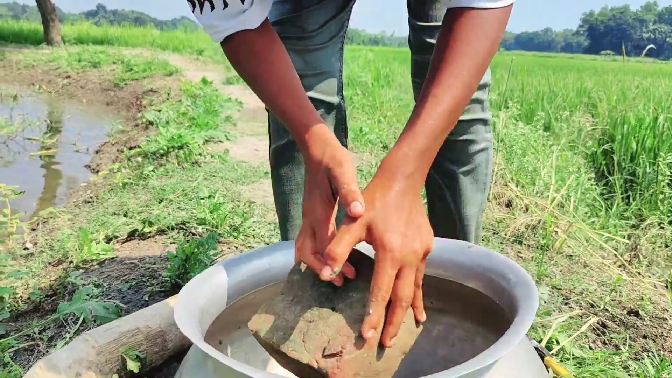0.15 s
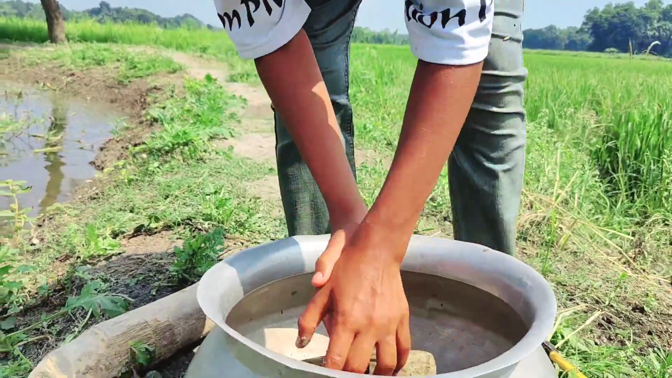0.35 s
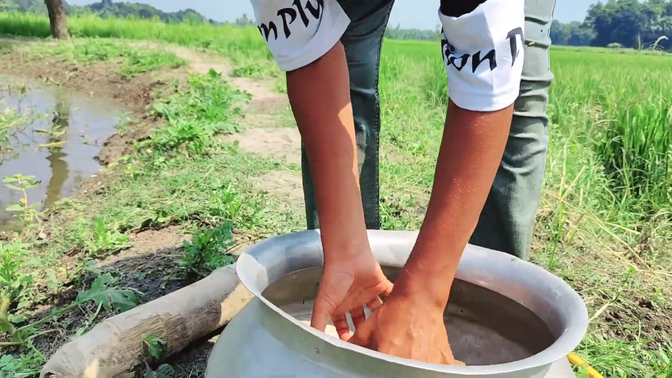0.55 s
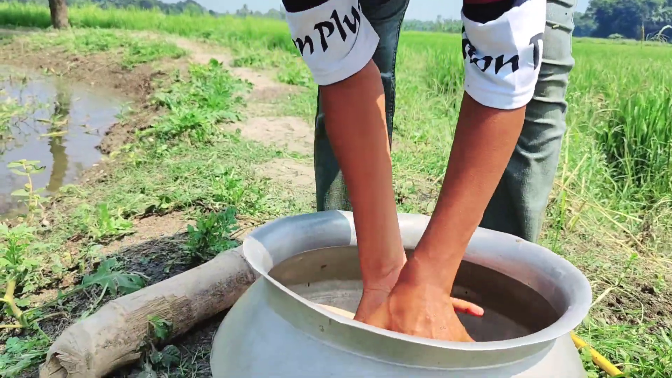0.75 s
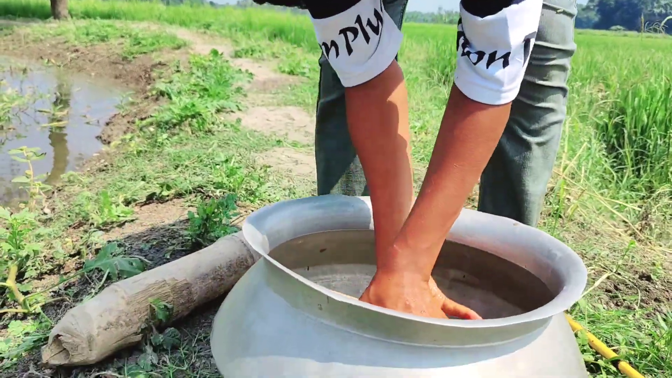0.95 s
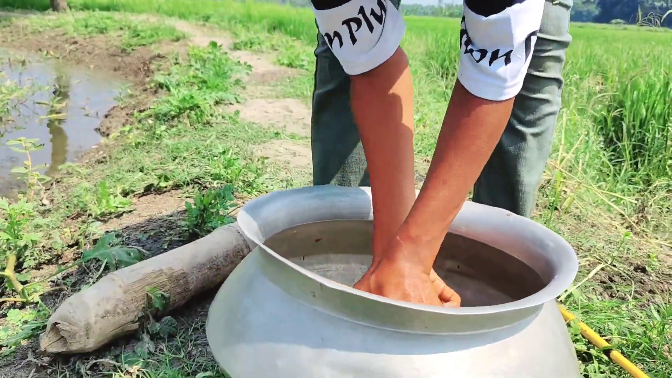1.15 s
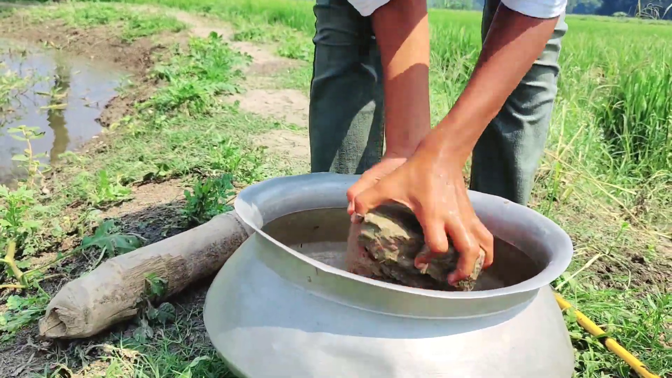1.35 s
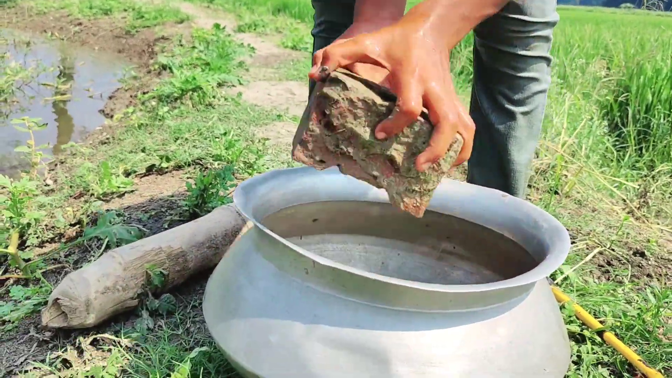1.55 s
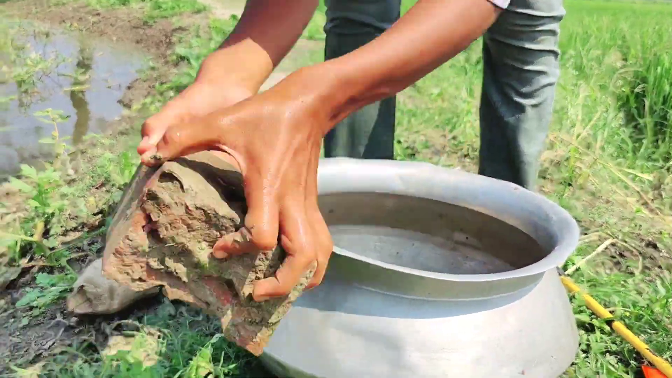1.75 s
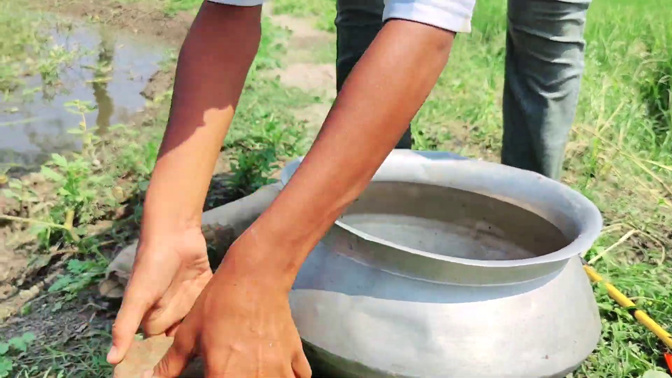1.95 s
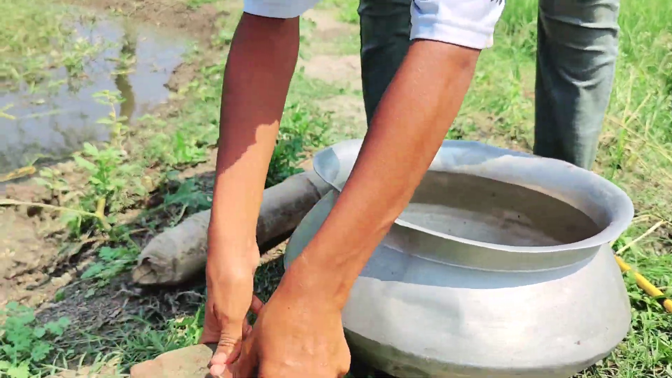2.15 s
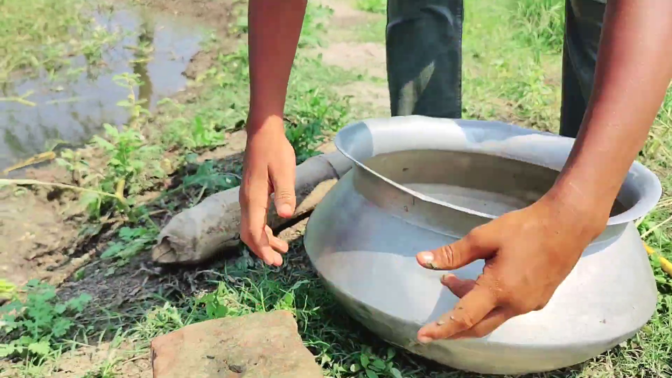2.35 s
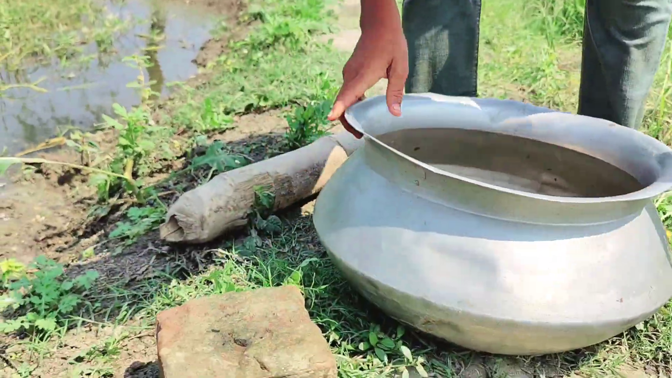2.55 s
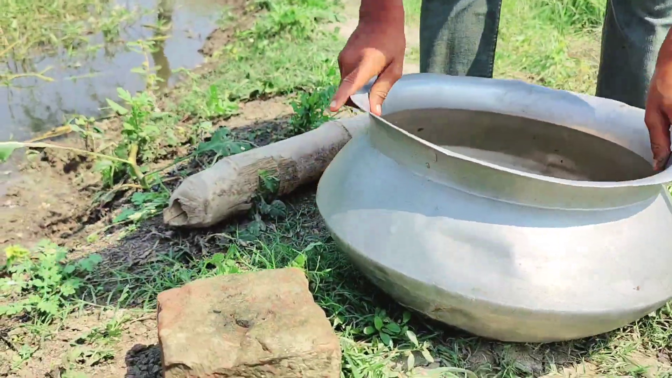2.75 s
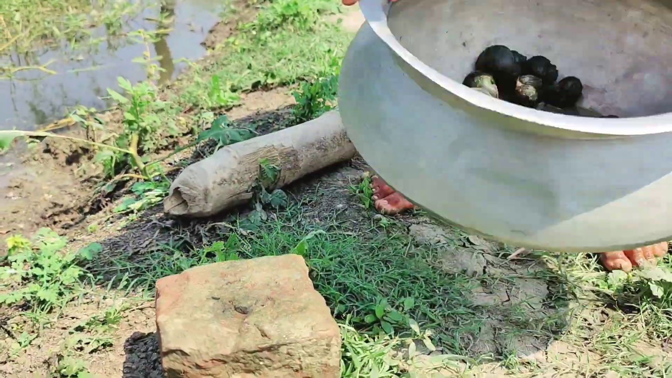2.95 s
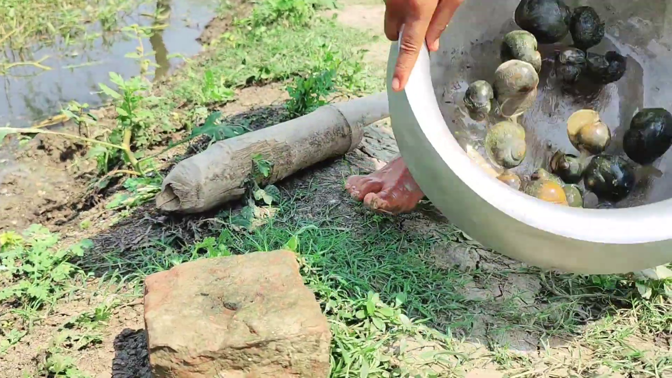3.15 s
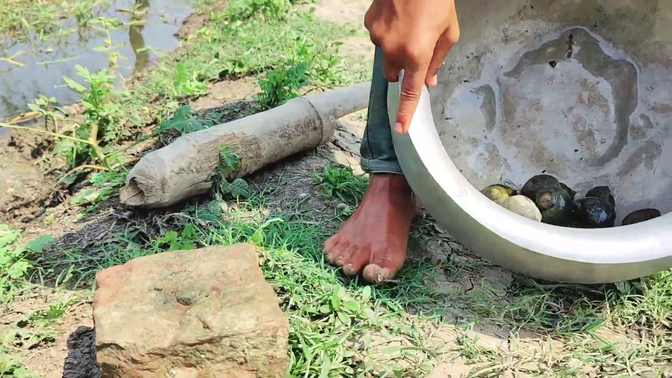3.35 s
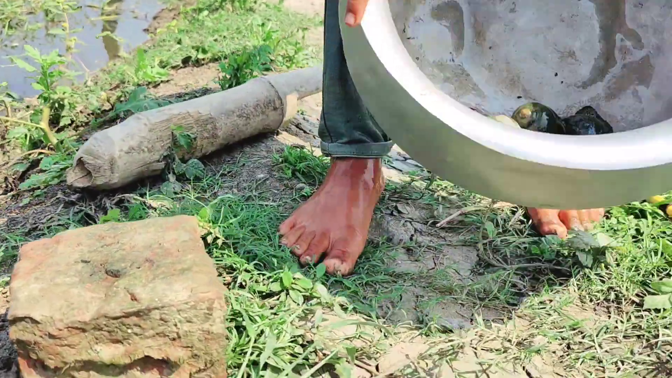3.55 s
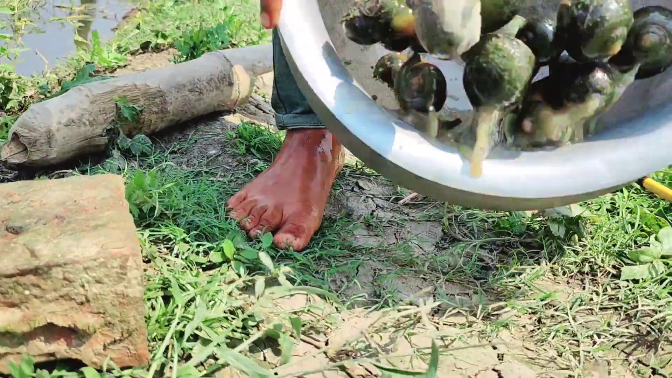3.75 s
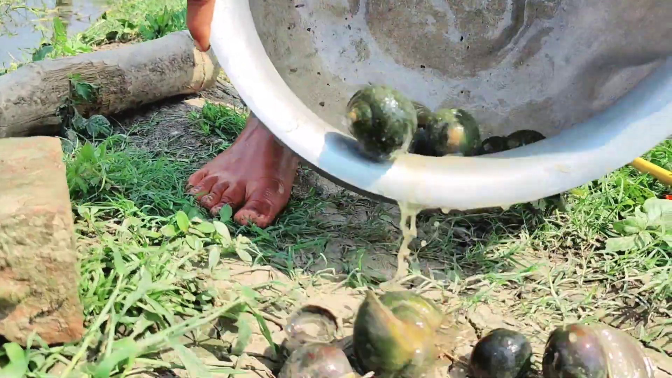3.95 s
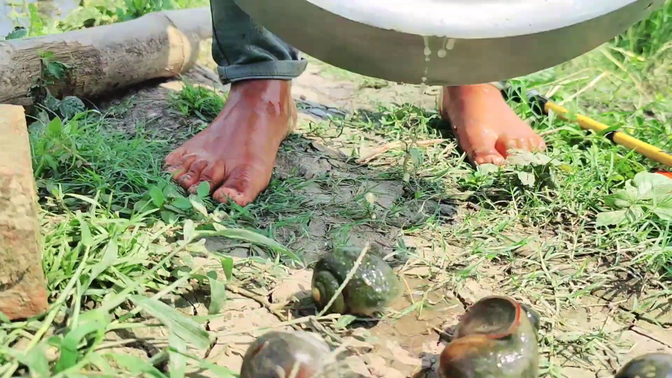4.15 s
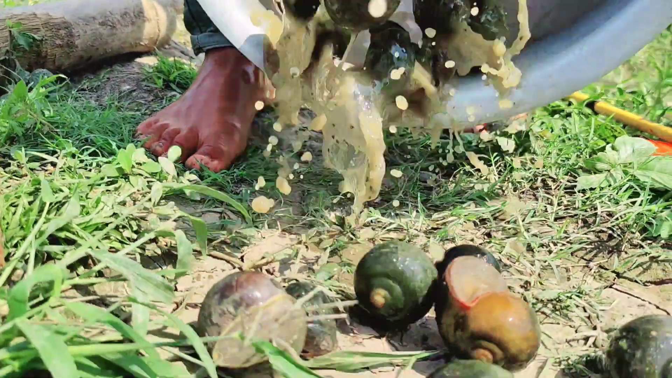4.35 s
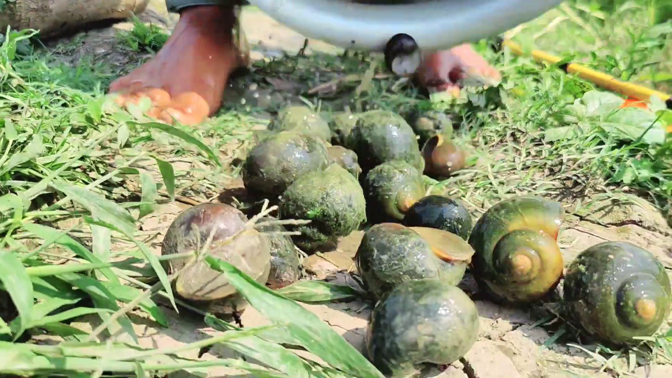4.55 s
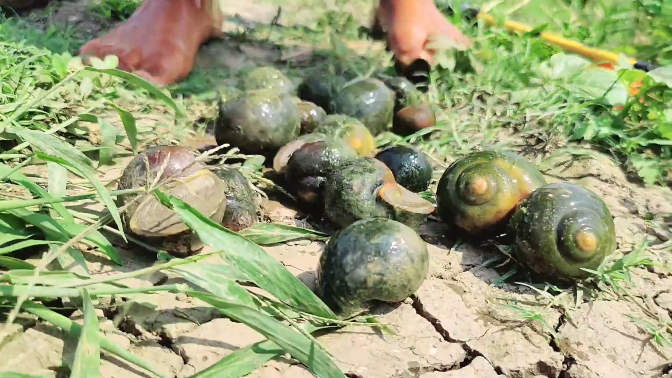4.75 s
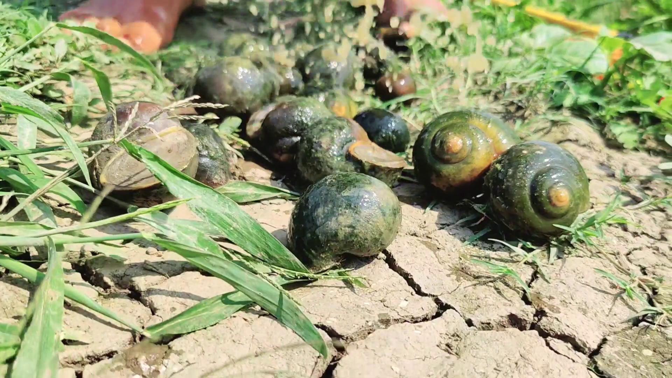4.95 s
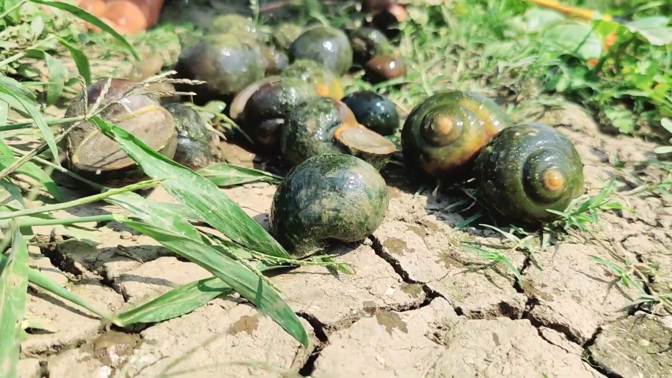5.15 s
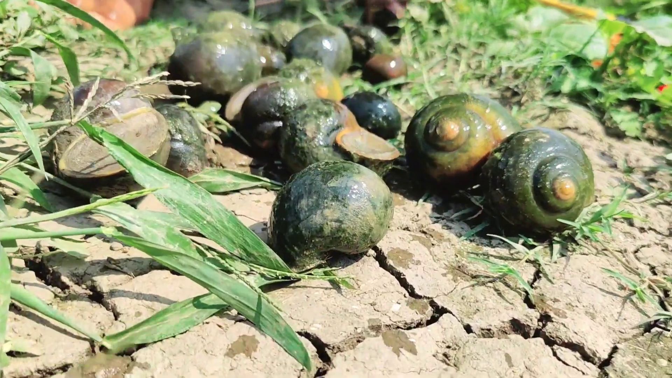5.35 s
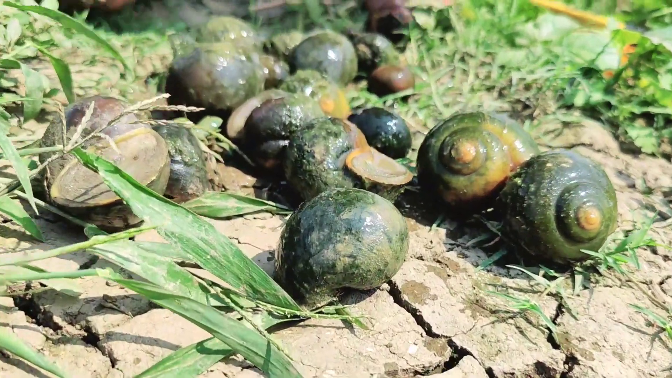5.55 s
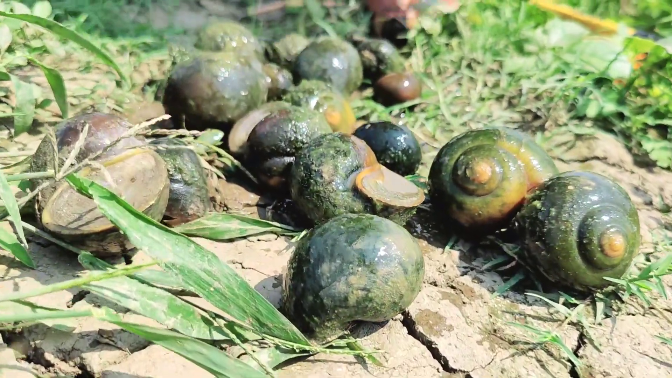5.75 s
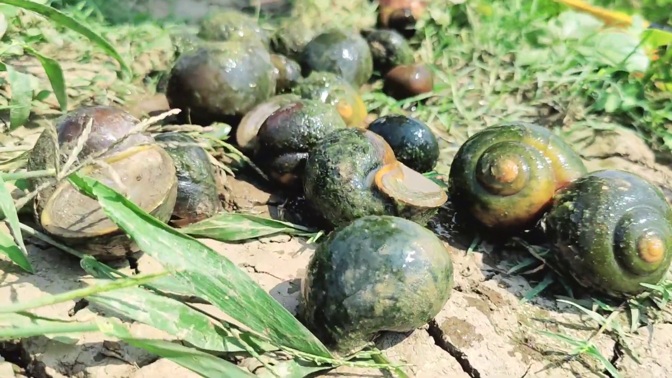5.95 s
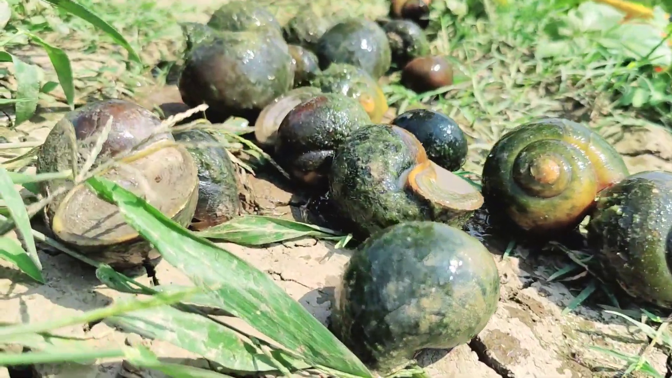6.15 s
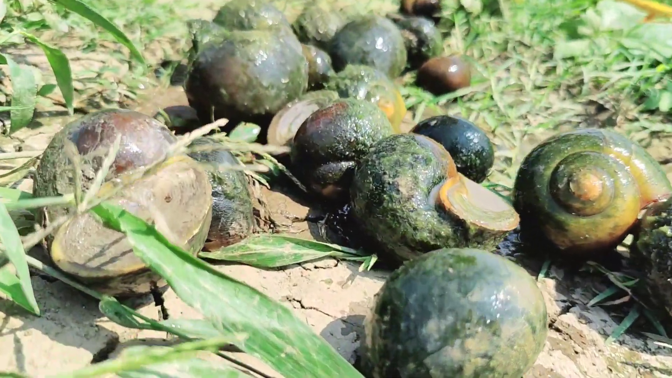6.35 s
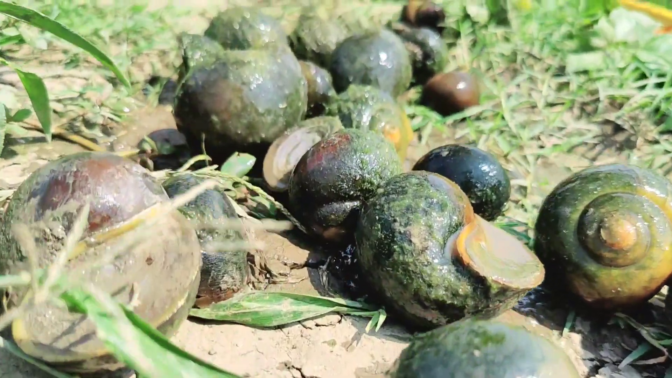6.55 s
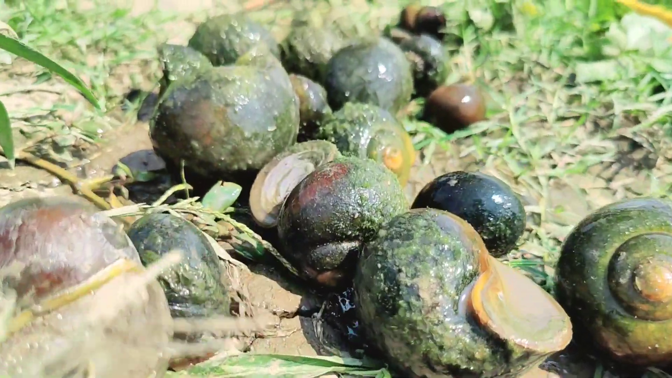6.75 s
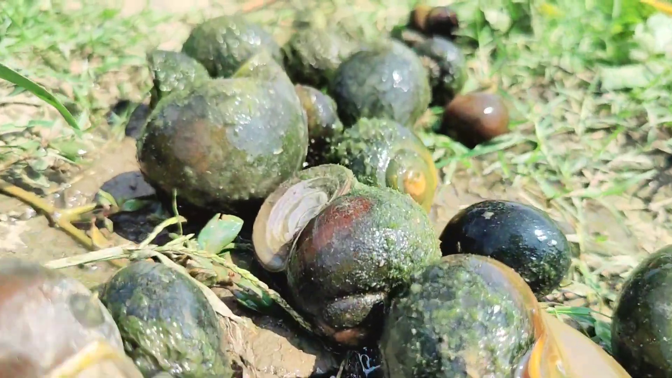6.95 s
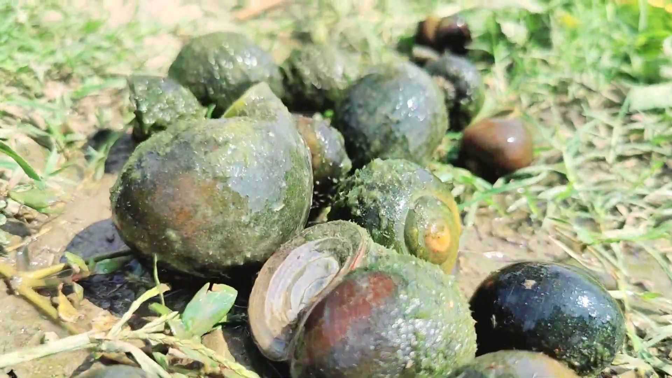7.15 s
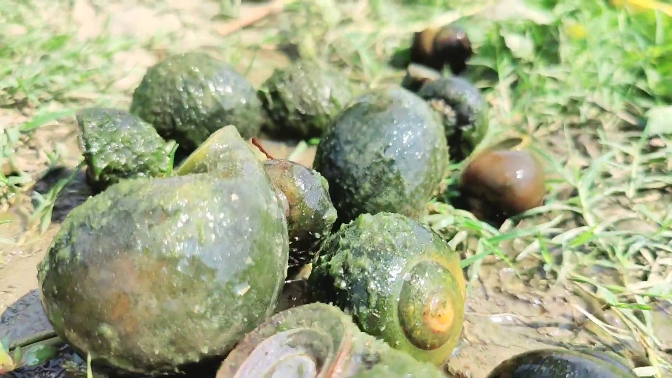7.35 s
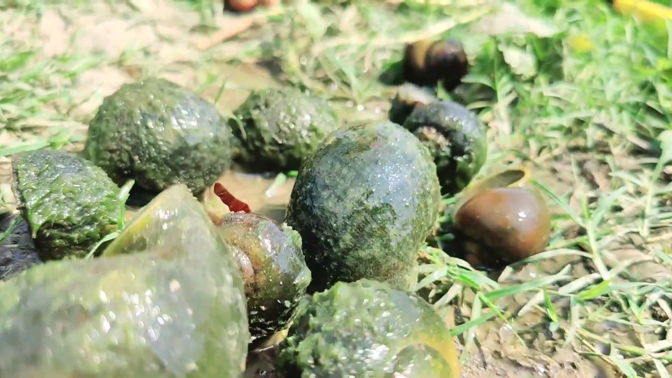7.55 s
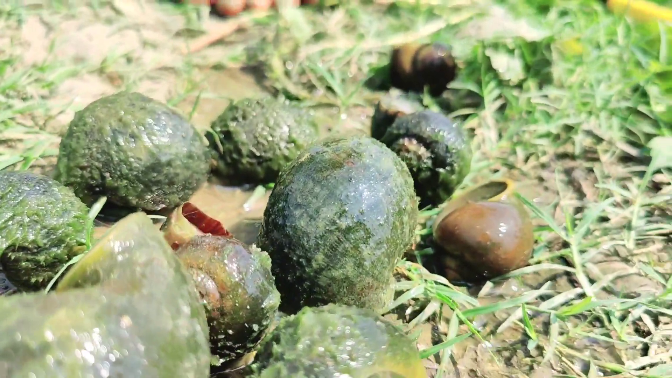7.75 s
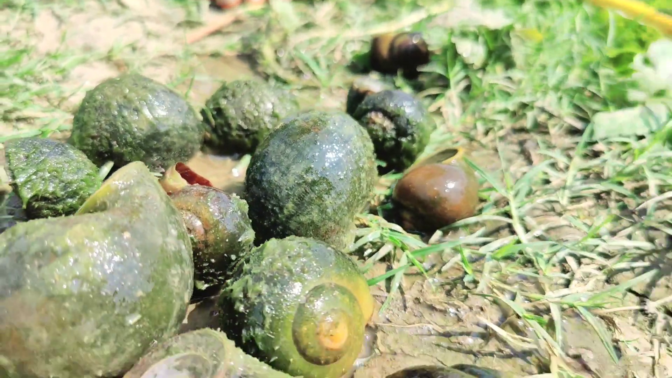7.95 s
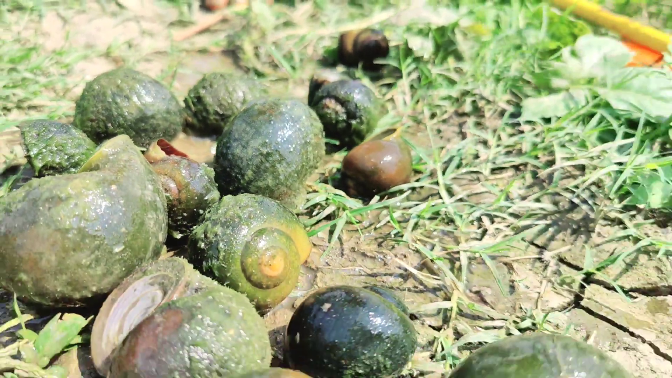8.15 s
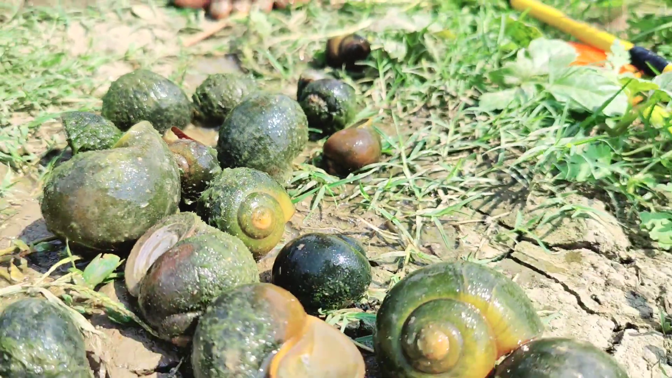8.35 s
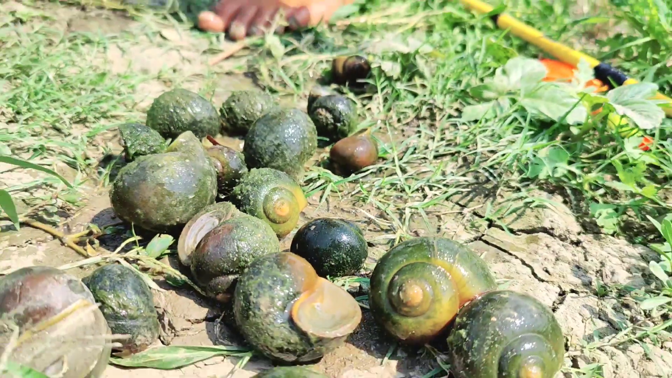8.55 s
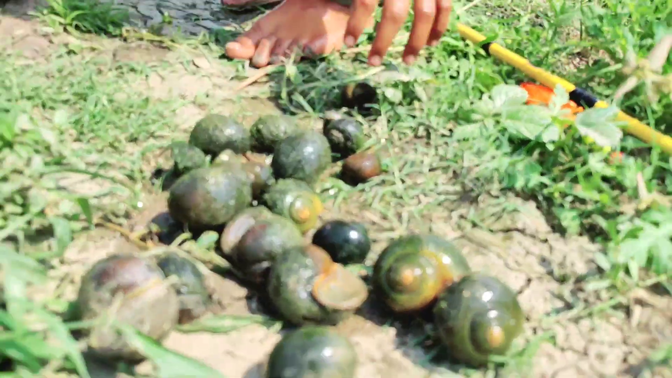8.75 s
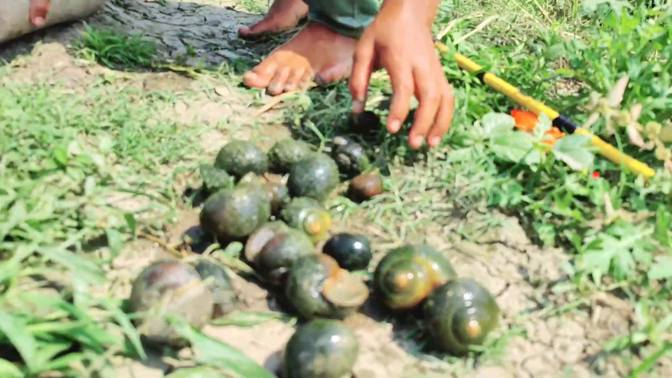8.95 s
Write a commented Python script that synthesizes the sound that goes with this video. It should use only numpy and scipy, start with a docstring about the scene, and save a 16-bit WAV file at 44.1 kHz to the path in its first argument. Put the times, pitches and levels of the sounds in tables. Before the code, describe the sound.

A brick grinds and knocks out of an aluminium basin, then wet water snails clatter and tumble from it onto dry ground outdoors.

```python
"""Water snails tumble down a tipped aluminium basin: shells clack, drum on its floor and ring its damped modes.
A little water leaves with them as spatter and bubbles; the last snails are shaken out.
Before that a brick grinds, judders and knocks out of the basin and drops on the grass; at the end the basin is set down.
Behind, grass brushes and a small bird whistles now and then, and two far pump engines thud throughout."""
import sys
import numpy as np
from scipy import signal
from scipy.fft import rfft, irfft, next_fast_len
from scipy.io import wavfile
from scipy.ndimage import uniform_filter1d, map_coordinates

SR = 44100
rng = np.random.default_rng(int(sys.argv[2]) if len(sys.argv) > 2 else 0)


def materialize(psi):
    """Save the field psi as 16-bit PCM at rate SR to the path in sys.argv[1].

    A 1-D psi becomes a single channel; in a 2-D psi each row is a channel.
    """
    bounded = np.clip(np.atleast_2d(psi).T, -1, 1)
    quanta = np.round(bounded * 32767).astype(np.int16)
    wavfile.write(sys.argv[1], SR, quanta)


N = 397341

# Levels are relative: source gains and the output gain follow.
# far pump engines: firings_per_s, level_db
PUMP_ENGINES = [(14.08, -45), (14.78, -47.5)]
# dips of the field hiss: middle_s, sigma_s, removed_share_db
HISS_DIPS = [(7.83, 0.45, -4.5)]
# arched bird notes: start_s, length_s, top_hz, level_db
BIRD_NOTES = [(2.151, 0.0244, 5160, -44), (8.064, 0.021, 4680, -63.5), (8.3, 0.0357, 4950, -68),
              (8.355, .036, 4720, -67), (8.378, 0.051, 5480, -64), (8.494, 0.047, 5300, -62.5),
              (8.54, 0.029, 4870, -59.5), (8.64, 0.13, 5400, -61)]
# feet and hands brushing grass: middle_s, sigma_s, level_db
GRASS_STROKES = [(2.69, 0.025, -51.5), (2.88, 0.053, -54.5), (3.2, 0.14, -57), (5.04, 0.043, -51.5),
                 (5.68, 0.017, -49.5), (6.9, 0.14, -53), (8.9, 0.091, -64)]
# stalks crackling close by: middle_s, sigma_s, level_db
STALK_CRACKLES = [(5.27, 0.059, -52.5), (7.4, 0.046, -50), (7.57, 0.055, -50)]
# ticks of wet shells, grit and stalks: start_s, level_db, pitch_hz
DRY_TICKS = [(0.947, -32.5, 2210), (1.119, -28, 1690), (1.155, -31.5, 1220), (2.165, -21, 1336),
             (3.025, -33, 1940), (3.5688, -11, 5080), (4.6812, -21, 6670), (4.779, -34, 3500),
             (4.848, -30.5, 3946), (6.57, -45.5, 2920), (7.536, -34, 1200), (7.566, -39.5, 2460)]
# bumps on the ground: start_s, push_db, pitch_hz, crunch_db, basin_ring_db
GROUND_BUMPS = [(0.27, -11, 129.3, -32, -38.5), (2.167, -16.5, 104, -38.5, -75),
                (5.15, -25.5, 56, -78, -80), (6.949, -14.5, 205, -25, -23), (7.089, -29, 168, -37.5, -36)]
# brick pulled over the basin floor: start_s, hold_s, level_db
BRICK_PULLS = [(-.02, 0.071, -18), (0.264, 0.084, -18.5), (0.423, 0.29, -18.5), (.94, 0.17, -45.5)]
# brick edge sticking and slipping: middle_s, sigma_s, level_db, slips_per_s (nominal, at middle_s)
STICK_SLIPS = [(0.029, 0.03, -19, 276), (0.112, 0.028, -24, 258), (0.297, 0.017, -17, 440)]
# brick striking the basin: start_s, level_db, drum_db, pitch_hz
BRICK_HITS = [(0.179, -13.5, -24, 940), (0.203, -2, -13.5, 1000), (0.281, -2.5, -7.5, 1300),
              (0.314, -2, -24.5, 1587), (0.426, -2.5, -9, 1340), (0.462, -4.5, -4.5, 1530),
              (0.568, -3, -18, 1360), (0.61, -0.5, -14, 1410), (0.664, -3.5, -8, 2576),
              (0.693, -2.5, -5.5, 2050), (0.747, -9, -15, 956), (.893, -23.5, -22, 1496),
              (1.288, -18, -25.5, 900), (1.35, -17.5, -24.5, 1393), (1.415, -23, -32.5, 1100)]
# shells striking metal or each other: start_s, level_db, drum_db, pitch_hz
SHELL_STRIKES = [(3.331, -3.5, -4, 1361), (3.345, -8, -32, 2885), (3.376, -2, -20, 1150),
                 (3.434, -1.5, -10, 1630), (3.471, -4, -12, 1380), (3.544, -6.5, -12, 2024),
                 (3.566, -7, -13.5, 1381), (3.701, -21, -26.5, 1253), (3.844, -3, -10, 1130),
                 (3.875, -2.5, -17, 1114), (3.935, -3, -11.5, 1232), (3.969, -5.5, -5.5, 1208),
                 (3.984, -6, -17, 2030), (4.016, -2.5, -19.5, 1640), (4.05, -3.5, -15, 1703),
                 (4.089, -7.5, -16, 2070), (4.122, -8, -22, 1347), (4.196, -14, -7.5, 2650),
                 (4.247, -10.5, -33, 1434), (4.359, -17.5, -17.5, 1670), (4.388, -2.5, -15, 1604),
                 (4.409, -7, -15, 1184), (4.516, -10.5, -22, 443), (4.518, -0.5, -29, 1896),
                 (4.543, -6, -26, 1134), (4.6, -3.5, -31, 1930), (4.643, -16, -30, 2087),
                 (4.71, -24.5, -43, 2270)]
# snails sent off by a tilt or shake: start_s, hold_s, release_t60_s, clatter_db, drum_db, water_db
SNAIL_SURGES = [(3.326, 0.15, 0.28, -17, -21, -29), (3.54, 0.014, 0.47, -30.5, -31, -47),
                (3.792, 0.027, 1.77, -30, -26.5, -54), (3.843, 0.24, 0.48, -17.5, -21, -33.5),
                (4.384, 0.035, 0.21, -14, -26.5, -27), (4.514, 0.095, 0.2774, -21.5, -27.5, -25.5)]
# basin modes: mode_hz, undamped_t60_s, shell_db, brick_db
BASIN_MODES = [(426, 0.75, -1.5, -5.5), (682.4, 0.34, -10.5, -15), (763, .2, -20, -10.5),
               (1006, 0.046, -6, -7.5), (1173.7, 0.23, 0, -1.5), (1377, 0.27, -6, 0.5),
               (1650, 0.075, -3, -5), (2029, 0.24, -8, -7.5), (2630, 0.031, -7, -7.5)]

# engine exhaust spectrum: freq_hz, relative_db
EXHAUST_SPECTRUM = [(18, -37), (50, -3), (110, 3), (210, -8), (430, -15), (800, -35), (1900, -75)]
# field hiss spectrum: freq_hz, relative_db
AIR_SPECTRUM = [(1200, -7), (2400, 3), (3600, -10), (5000, -7.5), (7000, -22), (15000, -23)]
# brushed grass spectrum: freq_hz, relative_db
GRASS_SPECTRUM = [(600, -17), (1300, 4), (2400, 3.5), (15000, -17.5)]
# spatter, cracks and stalks spectrum: freq_hz, relative_db
SPRAY_SPECTRUM = [(1500, -26), (4000, -1.5), (15000, -3.5)]
# grinding and crunching grit spectrum: freq_hz, relative_db
GRIT_SPECTRUM = [(250, -7.5), (550, -5.5), (2000, -4.5), (4000, -18.5), (9000, -34), (15000, -36)]
# drummed basin floor spectrum: freq_hz, relative_db
DRUM_SPECTRUM = [(50, -26), (140, -8.5), (290, 0), (520, -11.5), (1200, -45)]
# shell clatter spectrum: freq_hz, relative_db
SHELL_SPECTRUM = [(600, -17.5), (1100, -5.5), (2200, 4.5), (4000, -7.5), (9000, -23), (15000, -31)]
# likeness of left and right: freq_hz, correlation (1 = mono)
STEREO_LIKENESS = [(300, 0.98), (600, 0.78), (1300, 0.66), (2800, .42), (14000, 0.53)]
# microphone port, a notch and a peak: freq_hz, gain_db
PORT_RESPONSE = [(4800, -0.5), (5900, -4), (7100, 7), (8700, 2)]

TOP_HZ = 15600
BIRD_RISE_MAX_S = 0.04
BIRD_ARCH_HZ, BIRD_ARCH_LENGTH_S = 876, .05  # arch depth of a note of this length
PULL_ATTACK_S, PULL_SLOPE_DB_PER_S, PULL_RELEASE_T60_S = 0.014, 7, 0.56
SURGE_ATTACK_S, SURGE_SLOPE_DB_PER_S = 0.0083, -2
JUDDER_GLIDE_OCTAVES_PER_S = 0.7
DRUM_HZ, DRUM_T60_S = 264.6, .06  # basin floor under one blow
BASE_HZ = 719  # bumps excite the basin modes near this pitch
SYMPATHY_HZ = 35  # half-width of the modes' response around a blow's pitch
HOLLOW_SCATTER = .06  # log-frequency spread of a knock's core
SHELL_COLUMN, BRICK_COLUMN, CRUNCH_COLUMN = 2, 3, 3


def amp(db):
    """Decibels to gain."""
    return 10 ** (np.asarray(db) / 20)


def unit(x):
    """Scale to rms 1."""
    return x / np.sqrt(np.mean(x ** 2) + 1e-20)


def along(points, hz):
    """Interpolate (freq_hz, value) points on a log-frequency axis."""
    f, v = np.transpose(points)
    return np.interp(np.log(hz + 1), np.log(f), v)


def wobble(knots_per_s):
    """Smooth random curve through Gaussian knots."""
    knots = rng.standard_normal(int(N * knots_per_s / SR) + 4)
    return map_coordinates(knots, [np.arange(N) * knots_per_s / SR])


def fade(t, t60):
    """Exponential decay of 60 dB in t60."""
    return np.exp(-np.log(1000) * t / t60)


def add(track, start_s, sound):
    """Mix a sound into a track in place."""
    start = max(round(start_s * SR), 0)
    part = track[..., start:start + sound.shape[-1]]
    part += sound[..., :part.shape[-1]]


def noise():
    """Independent white noises for middle and side."""
    return rng.standard_normal((2, N))


def colour(x, spectrum):
    """Minimum-phase filter that keeps the power of white noise."""
    size = 4096
    gain = unit(amp(along(spectrum, np.fft.rfftfreq(size, 1 / SR))))
    cepstrum = irfft(np.log(np.maximum(gain, 1e-6)))
    fold = np.r_[1, np.full(size // 2 - 1, 2), np.zeros(size // 2)]
    impulse = irfft(np.exp(rfft(cepstrum * fold)))
    return signal.fftconvolve(x, impulse[None], axes=1)[:, :N]


def patchy(depth_db):
    """Noise whose colour changes from instant to instant, as each contact has its own."""
    z = signal.stft(noise(), nperseg=256)[2]
    patches = rng.standard_normal(z.shape[1:])
    patches = uniform_filter1d(patches, size=3, axis=0)
    patches = uniform_filter1d(patches, size=5, axis=1)
    varied = z * amp(depth_db * unit(patches))
    return unit(signal.istft(varied, nperseg=256)[1][:, :N])


def swells(rows):
    """Sum of Gaussian strokes; rows of middle_s, sigma_s, level_db."""
    t = np.arange(N) / SR
    return sum(amp(db) * np.exp(-.5 * ((t - s) / sigma_s) ** 2) for s, sigma_s, db in rows)


def stroke(start_s, hold_s, attack_s, slope_db_per_s, release_t60_s):
    """Envelope of one push: linear attack, sloping hold, exponential release."""
    t = np.maximum(np.arange(N) / SR - start_s, 0)
    held = np.minimum(t / attack_s, 1) * amp(slope_db_per_s * np.minimum(t, hold_s))
    return held * fade(np.maximum(t - hold_s, 0), release_t60_s)


def contacts(per_s, spread_db, t60):
    """Envelope of random uneven small contacts, levelled to a local rms near 1."""
    count, t = int(per_s * N / SR), np.arange(SR // 4) / SR
    at = ((np.arange(count) + 2 * rng.random(count)) * SR / per_s).astype(int)
    powers = amp(spread_db * rng.standard_normal(count)) ** 2
    impulses = np.bincount(at, powers, N)[:N]
    shape = fade(t, t60) * (1 - np.exp(-t / 0.00085))
    power = np.abs(signal.fftconvolve(impulses, shape ** 2)[:N])
    return np.sqrt(power / (np.abs(uniform_filter1d(power, size=4000)) + 1e-9))


def blows(rows, t60, level_column=1):
    """Envelope of listed blows, summed as power."""
    power, t = np.zeros(N), np.arange(SR // 4) / SR
    shape = fade(t, t60) * (1 - np.exp(-t / 0.00058))
    for row in rows:
        add(power, row[0], (amp(row[level_column]) * shape) ** 2)
    return np.sqrt(power)


def grains(per_s, hz, scatter, cycles, spread_db, rise):
    """Random short pings, levelled to a local rms near 1 in the middle; their pitch rises as they die."""
    count, t = int(per_s * N / SR), np.arange(700) / SR
    pitch, size, side = rng.standard_normal((count, 3)).T[:, :, None]
    f = np.minimum(hz * np.exp(scatter * pitch), SR / 3)
    age = t * f / cycles
    tone = np.sin(2 * np.pi * f * t * (1 + rise * np.minimum(age, 1)))
    ping = amp(spread_db * size) * fade(age, 0.92) * tone
    at = (rng.integers(0, N, (count, 1)) + np.arange(len(t))).ravel()
    pair = np.array([np.bincount(at, p.ravel(), N)[:N] for p in (ping, ping * side)])
    return pair / np.sqrt(np.abs(uniform_filter1d(pair[0] ** 2, size=4000)) + 1e-9)


def cluster(t, hz, scatter, t60, count=24):
    """Dry knock: short modes scattered around one pitch, as middle and side."""
    pitch = np.minimum(hz * np.exp(scatter * rng.standard_normal((count, 1))), SR / 3)
    modes = np.sin(2 * np.pi * (pitch * t + rng.random((2, count, 1))))
    return modes.sum(axis=1) / np.sqrt(count) * fade(t, t60)


def sympathy(t, hz):
    """Undamped ring of the basin modes, strongest near the pitch of a blow."""
    ring = np.zeros(len(t))
    for mode_hz, t60, *_ in BASIN_MODES:
        nearness = 1 / (1 + ((mode_hz - hz) / SYMPATHY_HZ) ** 2)
        ring += nearness * fade(t, t60) * np.sin(2 * np.pi * mode_hz * t)
    return ring


def basin(force, damping, level_column):
    """Basin modes build up and ring on under a rattling force; damping divides each t60."""
    t = np.arange(SR * 3 // 4) / SR
    ring = np.zeros(len(t))
    for row in BASIN_MODES:
        tone = np.sin(2 * np.pi * row[0] * t + rng.uniform(0, 2 * np.pi))
        ring += amp(row[level_column]) * unit(fade(t, row[1] / damping) * tone)
    return signal.fftconvolve(force * noise(), ring[None] / np.linalg.norm(ring), axes=1)[:, :N]


def clacks(hits, t60, scatter, knock_db, hollow_db, ring_db):
    """A hard contact gives a broad knock with a hollow core, drums the floor and rings the nearest modes."""
    out, t = np.zeros((2, N)), np.arange(SR // 2) / SR
    onset, short = 1 - np.exp(-t / 0.0021), t[:SR // 10]
    for s, db, drum_db, hz in hits:
        drum_hz = DRUM_HZ * np.exp(0.16 * rng.standard_normal())
        drum = fade(t, DRUM_T60_S) * np.sin(2 * np.pi * drum_hz * t) * [[1], [0]]
        ring = amp(db + ring_db) * sympathy(t, hz) * [[1], [rng.uniform(-1, 1)]]
        add(out, s, (ring + amp(drum_db) * drum) * onset)
        knock = amp(knock_db) * cluster(short, hz, scatter, t60)
        core = amp(hollow_db) * cluster(short, hz, HOLLOW_SCATTER, 2 * t60, count=6)
        add(out, s, amp(db) * (knock + core) * onset[:len(short)])
    return out


def field():
    """Two slow single-cylinder pumps puff noise, drifting in and out of step under a wavering hiss."""
    t, puffs = np.arange(N) / SR, np.zeros((2, N))
    for firings_per_s, db in PUMP_ENGINES:
        since_s = (t * firings_per_s + 0.0091 * wobble(4.0)) % 1 / firings_per_s
        carry = amp(db + wobble(3))
        puffs += carry * unit(fade(since_s, 0.15) + 0.59) * noise()
    hiss_level = amp(-62.5 + 2 * wobble(1.6)) * (1 - np.minimum(swells(HISS_DIPS), 1))
    return colour(puffs, EXHAUST_SPECTRUM) + hiss_level * colour(patchy(depth_db=2), AIR_SPECTRUM)


def bird():
    """Thin whistles leap up and sink back; the longer the note, the deeper its arch."""
    song = np.zeros(N)
    for s, length_s, top_hz, db in BIRD_NOTES:
        t = np.arange(int(length_s * SR)) / SR
        crest_s = min(BIRD_RISE_MAX_S, length_s / 2)
        away = np.where(t < crest_s, (crest_s - t) / crest_s, (t - crest_s) / (length_s - crest_s))
        hz = top_hz - BIRD_ARCH_HZ * np.sqrt(length_s / BIRD_ARCH_LENGTH_S) * away ** 1.6
        envelope = np.sqrt(np.abs(np.sin(np.pi * t / length_s)))
        add(song, s, amp(db) * envelope * np.sin(2 * np.pi * np.cumsum(hz) / SR))
    return np.array([song, song / 2])


def grass():
    """Blades brush softly as sparse contacts; stalks crackle as fine dense ones."""
    stalks = swells(STALK_CRACKLES) * contacts(per_s=450, spread_db=6.5, t60=0.035)
    blades = swells(GRASS_STROKES) * contacts(per_s=62, spread_db=2, t60=0.18)
    brush = blades + amp(-11.5) * stalks
    return colour(brush * patchy(depth_db=0.5), GRASS_SPECTRUM) + colour(stalks * noise(), SPRAY_SPECTRUM)


def ticks():
    """Each tick is a tiny noise crack and a brief dry knock."""
    knocks, t = np.zeros((2, N)), np.arange(SR // 20) / SR
    for s, db, hz in DRY_TICKS:
        add(knocks, s, amp(db - 2.5) * cluster(t, hz, scatter=.45, t60=0.025))
    cracks = colour(blows(DRY_TICKS, t60=0.032) * noise(), SPRAY_SPECTRUM)
    return knocks + amp(-22.5) * cracks


def thuds():
    """A bump gives a low push, a crunch of grit and the ring of the basin modes near its base pitch."""
    push, ring, t = np.zeros(N), np.zeros(N), np.arange(SR // 2) / SR
    shape = fade(t, 0.025) * (1 - np.exp(-t / 0.00083))
    for s, db, hz, _, ring_db in GROUND_BUMPS:
        add(push, s, amp(db + 7.0) * shape * np.sin(2 * np.pi * hz * t))
        add(ring, s, amp(ring_db) * sympathy(t, BASE_HZ))
    crunch = colour(blows(GROUND_BUMPS, t60=0.1, level_column=CRUNCH_COLUMN) * noise(), GRIT_SPECTRUM)
    return crunch + np.array([push + ring, np.zeros(N)])


def judder():
    """The brick's edge sticks and slips at an unsteady, rising rate: short harmonic groans."""
    t, groans = np.arange(N) / SR, np.zeros(N)
    for s, sigma_s, db, slips_per_s in STICK_SLIPS:
        glide = 2 ** (JUDDER_GLIDE_OCTAVES_PER_S * np.minimum(t - s, 1))
        rate = slips_per_s * glide * (1 + 0.038 * wobble(120))
        phase = 2 * np.pi * np.cumsum(rate) / SR
        sawtooth = unit(sum(np.sin(k * phase) / k for k in range(1, 7)))
        groans += swells([(s, sigma_s, db)]) * sawtooth
    return np.array([groans, np.zeros(N)])


def brick():
    """The brick grinds and knocks in the basin; its weight damps the wall and makes the floor boom."""
    drag = np.zeros(N)
    for s, hold_s, db in BRICK_PULLS:
        drag += amp(db) * stroke(s, hold_s, PULL_ATTACK_S, PULL_SLOPE_DB_PER_S, PULL_RELEASE_T60_S)
    grinding = amp(-6) * drag * contacts(per_s=220, spread_db=4.5, t60=0.1)
    force = np.hypot(grinding, amp(-17.5) * blows(BRICK_HITS, t60=0.17))
    floor = amp(-6.5) * drag * contacts(per_s=50, spread_db=2.5, t60=0.0523)
    grit = amp(-2.5) * colour(force * patchy(depth_db=3.5), GRIT_SPECTRUM)
    knocks = clacks(BRICK_HITS, t60=.04, scatter=.3, knock_db=-6.5, hollow_db=-8.5, ring_db=-20)
    t, floor_hz = np.arange(SR) / SR, 105
    mode = fade(t, 3.7) * np.sin(2 * np.pi * floor_hz * t)
    boom = amp(-15) * signal.fftconvolve(floor * noise(), mode[None] / np.linalg.norm(mode), axes=1)[:, :N]
    drum = colour(floor * noise(), DRUM_SPECTRUM)
    ring = basin(force, damping=5.2, level_column=BRICK_COLUMN)
    return grit + knocks + boom + judder() + drum + ring


def water(flow):
    """Water leaving with the snails spatters on dry mud and traps small bubbles that rise in pitch."""
    splashes = flow * contacts(per_s=230, spread_db=4.5, t60=0.18)
    spatter = colour(splashes * patchy(depth_db=5.5), SPRAY_SPECTRUM)
    bubbles = flow * grains(per_s=430, hz=3000, scatter=.4, cycles=15, spread_db=1, rise=0.083)
    return amp(-5.0) * spatter + bubbles


def surges():
    """Each tilt or shake drives clatter, drumming and water flow with one envelope."""
    clatter, drumming, flow = np.zeros((3, N))
    for s, hold_s, release_t60_s, db, drum_db, water_db in SNAIL_SURGES:
        heap = stroke(s, hold_s, SURGE_ATTACK_S, SURGE_SLOPE_DB_PER_S, release_t60_s)
        clatter += amp(db) * heap
        drumming += amp(drum_db) * heap
        flow += amp(water_db) * heap
    return clatter, drumming, flow


def snails(clatter, drumming):
    """Hollow shells clack densely, drum the basin floor and ring its wall, which their weight damps."""
    jostle = amp(-4.5) * clatter * contacts(per_s=110, spread_db=4, t60=0.05)
    force = np.hypot(jostle, amp(-17.0) * blows(SHELL_STRIKES, t60=0.087))
    floor = amp(-4) * drumming * contacts(per_s=70, spread_db=1, t60=0.0245)
    rattle = colour(force * patchy(depth_db=3.5), SHELL_SPECTRUM)
    strikes = clacks(SHELL_STRIKES, t60=.05, scatter=.36, knock_db=-8.5, hollow_db=-6.5, ring_db=-12)
    drum = colour(floor * noise(), DRUM_SPECTRUM)
    return rattle + strikes + drum + basin(force, damping=1.4, level_column=SHELL_COLUMN)


def scene():
    """Mix middle and side to stereo: near sources lean left, bass nearly mono, treble wide."""
    size = next_fast_len(N + SR // 4)
    hz = np.fft.rfftfreq(size, 1 / SR)
    clatter, drumming, flow = surges()
    near = ticks() + thuds() + brick() + water(flow) + snails(clatter, drumming)
    middle, side = field() + bird() + grass() + near
    alike = np.clip(along(STEREO_LIKENESS, hz), 0, 1)
    width = np.sqrt((1 - alike) / (1 + alike))
    lean = .07
    side = irfft(rfft(side, size) * width, size)[:N] + lean * near[0]
    return amp(2.0) * np.array([middle + side, middle - side])


def record(dry):
    """The microphone port colours the treble, peaks are rounded off and the band ends near TOP_HZ."""
    size = next_fast_len(N + SR // 4)
    hz = np.fft.rfftfreq(size, 1 / SR)
    heard = irfft(rfft(dry, size) * amp(along(PORT_RESPONSE, hz)), size)
    rounded = heard / (1 + np.abs(heard) ** 6) ** (1 / 6)
    low_pass = np.clip((TOP_HZ - hz) / 400 + .5, 0, 1) ** 2
    return irfft(rfft(rounded) * low_pass, size)[:, :N]


dry = scene()
out = record(dry)
materialize(out)
```